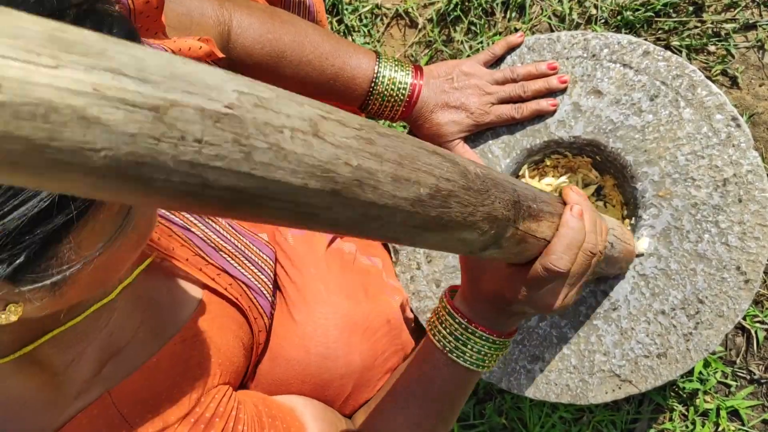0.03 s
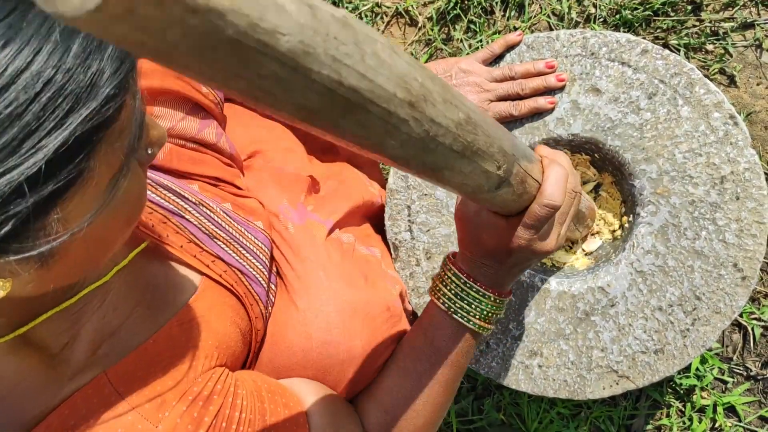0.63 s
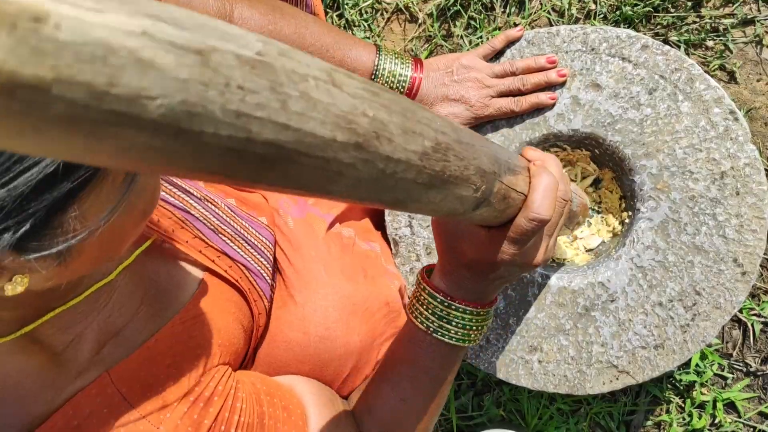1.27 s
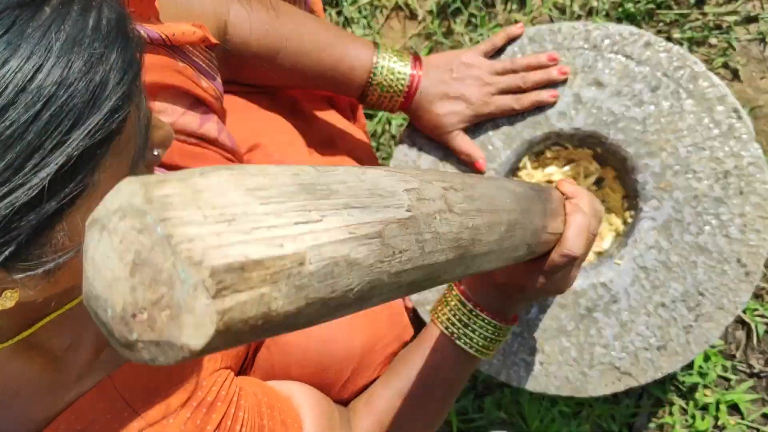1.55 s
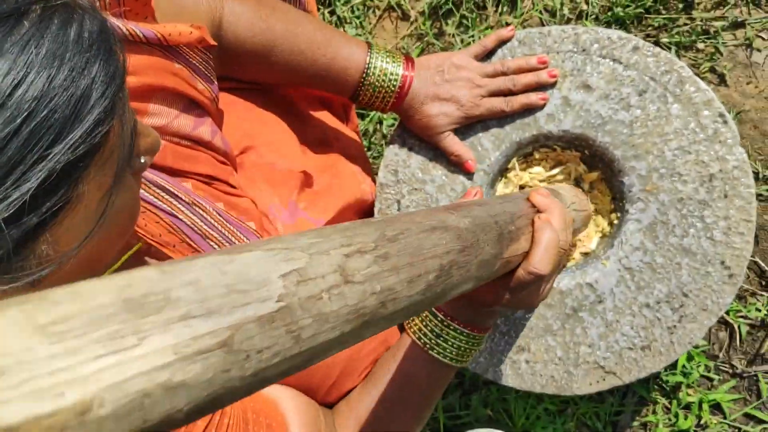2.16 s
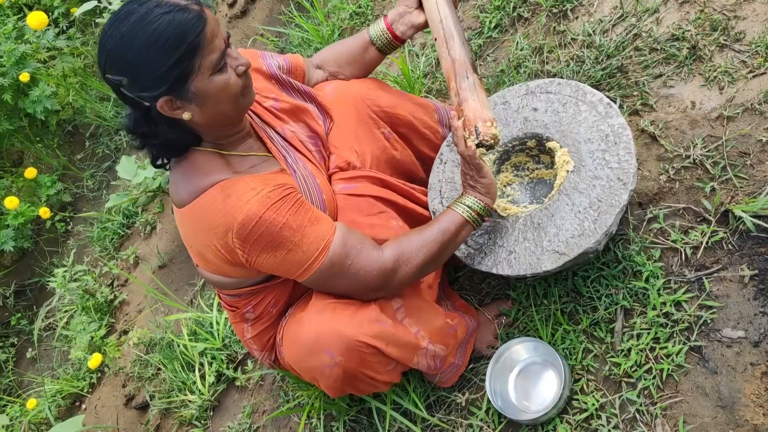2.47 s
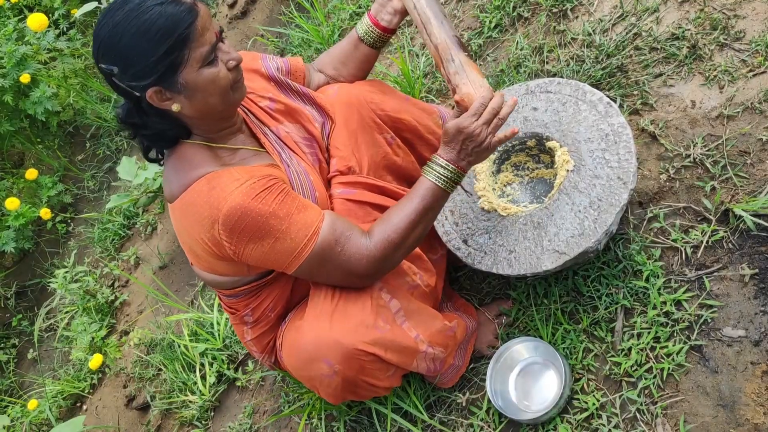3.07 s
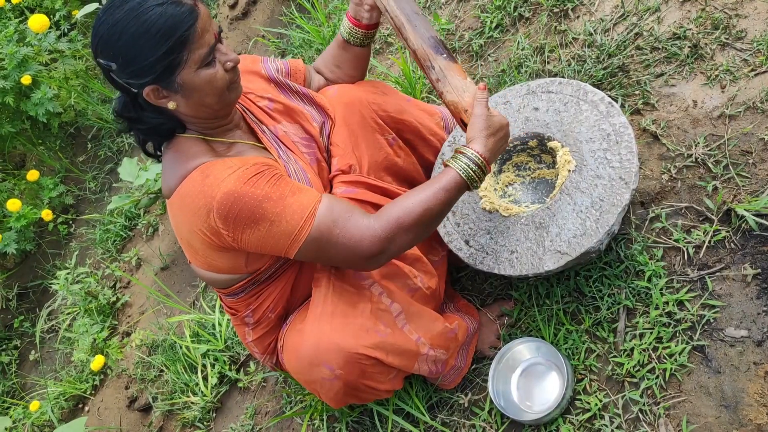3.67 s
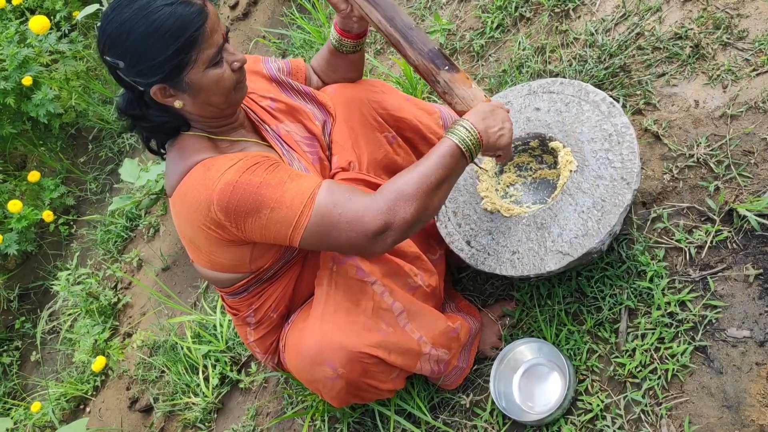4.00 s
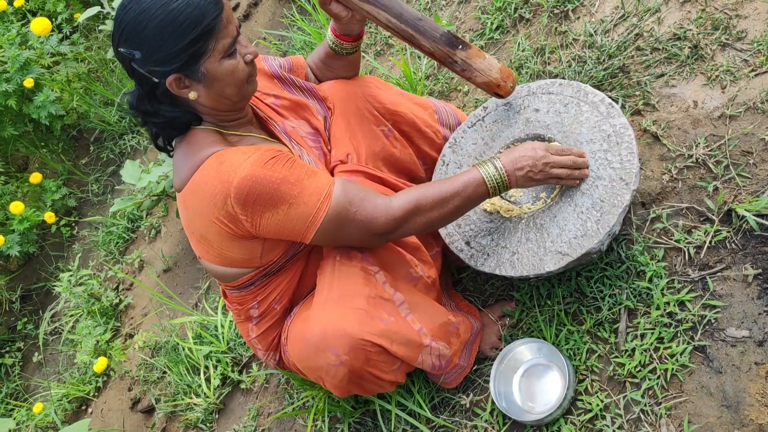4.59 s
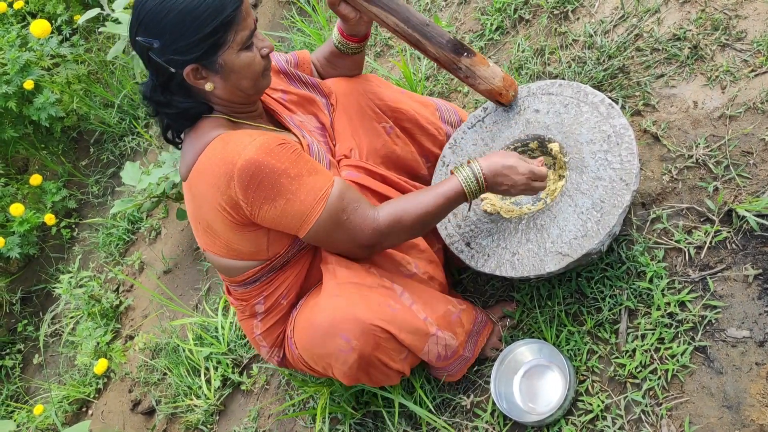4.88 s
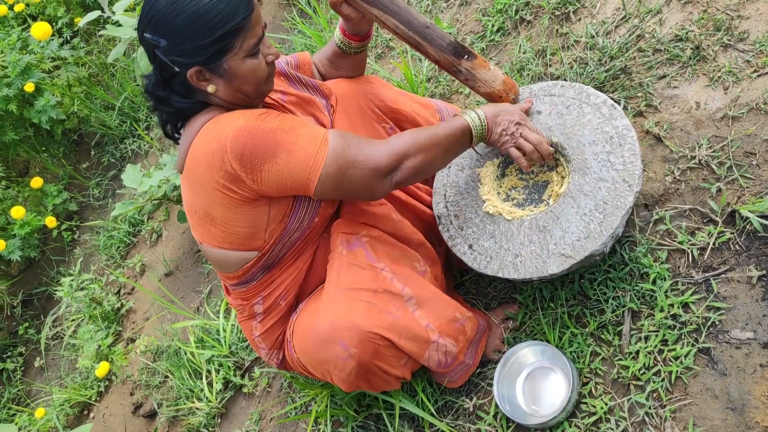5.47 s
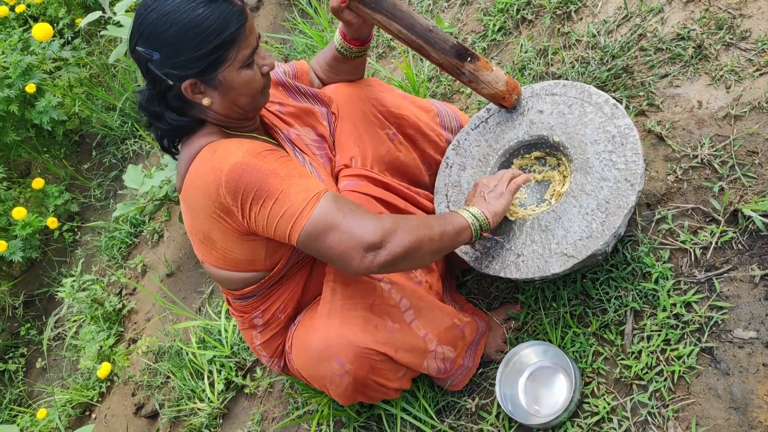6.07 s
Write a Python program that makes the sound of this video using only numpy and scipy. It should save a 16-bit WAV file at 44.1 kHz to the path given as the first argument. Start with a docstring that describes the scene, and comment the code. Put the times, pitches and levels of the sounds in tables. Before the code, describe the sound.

A wooden pestle pounds moist food in a stone mortar outdoors, heard from close by. Sharp knocks land right at the start and at about 0.5 seconds, then blows with a duller thud at 0.9 and 1.8 seconds. The mash gives short wet squelches, including a soft one near 1.3 seconds, and glass bangles clink between the blows. At 2.2 seconds the background shifts as if heard from a step further back: the low hum of a distant engine, present throughout with light wind, grows a little louder and a faint machine drone joins. Fingertips tap the stone lightly just after 3 seconds. From about 4 to 5.8 seconds a hand gathers the mash with tiny moist ticks, and the bangles clink near 4.3 seconds. A distant vehicle passes around 5.7 seconds. Faint birds whistle early on, then chirp and hoot now and then.

```python
"""A long wooden pestle pounds moist food in a stone mortar outdoors. Each impact excites the modes of shaft and
bowl; the squeezed mash squelches as wet films burst, and glass bangles clink on the wrist. From 2.2 s the
background changes; fingertips tap and a hand gathers the mash. A distant engine hums throughout, with light
wind, a far machine, a passing vehicle and a few birds."""
import sys
import numpy as np
from scipy import signal
from scipy.fft import rfft, irfft, next_fast_len
from scipy.io import wavfile
from scipy.ndimage import uniform_filter1d

SR = 44100
rng = np.random.default_rng(int(sys.argv[2]) if len(sys.argv) > 2 else 0)


def materialize(psi):
    """Save the field psi as 16-bit PCM at rate SR to the path in sys.argv[1].

    A 1-D psi becomes a single channel; in a 2-D psi each row is a channel.
    """
    bounded = np.clip(np.atleast_2d(psi).T, -1, 1)
    quanta = np.round(bounded * 32767).astype(np.int16)
    wavfile.write(sys.argv[1], SR, quanta)


N = 279594
TIME = np.arange(N) / SR
AGE = TIME[:SR // 2]  # time since the start of one event

# open-air hush, before and after 2.2 s: frequency_hz, relative_db
EARLY_HUSH_SPECTRUM = [(110, -19), (180, -4), (389, -22.5), (599, -20.5), (722, -14), (793, -18.5),
                       (1070, -22), (1370, -21), (1650, -19.5), (2310, -23), (3120, -27.5), (6260, -25.5),
                       (16000, -34)]
LATE_HUSH_SPECTRUM = [(200, 3), (400, -1), (560, -0.5), (680, -4.5), (900, 0), (1450, 0), (1750, -9.5),
                      (2080, 0), (2400, -4.5), (2850, -10), (3120, -14), (5200, -17.5), (8000, -15.5),
                      (10500, -24.5), (16000, -23.5)]
# wind rumble: frequency_hz, relative_db
WIND_SPECTRUM = [(12, 13), (35, 7), (60, 5), (100, 0.5), (145, -6.5), (200, -41), (300, -34)]
# gusts: peak_s, half_width_s, level_db
WIND_GUSTS = [(0.976, .025, -29.5), (1.15, 0.17, -48), (2.096, 0.16, -42.5)]
# noise bands of a far machine: centre_hz, width_hz, level_db
MACHINE_BANDS = [(527, 31, -69.5), (587, 10.5, -66.5), (2086, 70, -78), (2845, 56, -77.5), (3680, 480, -80)]
# far tyres: frequency_hz, relative_db
TYRE_SPECTRUM = [(400, -31), (720, -8.5), (890, 7.5), (1080, -7), (1750, -13.5), (2130, -3), (2450, -14),
                 (2780, -0.5), (3150, -21.5), (3950, -7.5), (4500, -18.5), (5300, -14.5), (6500, -20),
                 (16000, -31)]
# firing rate of the engine: time_s, rate_hz
FIRING_RATE = [(0, 78), (2.1, 77.5), (2.5, 79.8), (4.4, 77.74), (6.34, 76)]
# rising chirps of a small bird: start_s, length_s, start_hz, level_db, tip_accent_db
BIRD_CHIRPS = [(2.34, 0.13, 4140, -66.5, 5), (2.575, 0.11, 4150, -66, 10), (2.81, .14, 4140, -61, -6),
               (4.868, .07, 5200, -68.5, -3), (5.452, 0.099, 4270, -63, 5), (5.696, .07, 4430, -55.5, -1),
               (5.904, 0.11, 4300, -61, -4), (6.146, 0.12, 4340, -62.5, 5)]
# arched whistles of a far bird: start_s, length_s, start_hz, level_db
BIRD_WHISTLES = [(0.106, 0.33, 1730, -62.5), (0.597, 0.29, 1620, -67.5), (1.543, 0.21, 1640, -67.5),
                 (1.955, 0.25, 1640, -71), (3.573, 0.22, 1666, -67)]
# evenly paced hoots of a far bird: start_s, level_db
BIRD_HOOTS = [(2.21, -60.5), (3.459, -55.5), (4.732, -56), (5.961, -57)]
# fingertips tap the stone: start_s, level_db
FINGER_TAPS = [(3.008, -62), (3.083, -53.5), (3.173, -47.5), (3.258, -61), (6.235, -59)]
# a fingertip on gritty stone: frequency_hz, relative_db
FINGER_SPECTRUM = [(1100, -18), (1600, 10.5), (2200, -26), (3600, -15), (4300, -3), (5200, -18), (7400, -9),
                   (8700, 1), (9600, -10), (10800, -24), (15000, -30)]
# bangles knock together: start_s, peak_db, chatter_s
BANGLE_CLINKS = [(0.07, -13.5, 0.0031), (0.117, -12, 0.00024), (0.2175, -22.5, 0.01),
                 (0.472, -20.5, 0.0017), (0.561, -31, 0.022), (0.6275, -37.5, 0), (0.651, -21.5, 0.018),
                 (0.8993, -24, 0), (0.962, -23.5, 0), (0.981, -33, .024), (1.39, -23.5, 0.014),
                 (1.501, -14, .008), (1.5203, -18, 0.0083), (1.856, -23, .004), (2.2947, -38.5, 0),
                 (4.3208, -27.5, 0.019), (4.36, -36.5, 0.047), (4.4767, -45, 0)]
# modes of a glass hoop: pitch_hz, level_db, t60_s
BANGLE_MODES = [(4660, -20.5, 0.037), (4940, -16.5, 0.022), (6640, -18.5, .015), (8100, -6.5, 0.015),
                (8780, -5.5, 0.019), (9400, -10, 0.045), (9450, -16, 0.019), (10250, -14, 0.037),
                (12610, -14, 0.018), (12560, 0.5, 0.018), (13430, -16, 0.022), (14130, -2, 0.03),
                (14950, -8.5, 0.013), (15750, 4.5, 0.031), (15500, -11.5, 0.013)]
# the pestle squeezes the mash: start_s, level_db, swell_s, length_s, tilt_db_per_octave, cavity_hz, seep_db
MASH_SQUEEZES = [(0.0651, -27, .005, .017, -0.5, 7600, -6.5), (0.485, -30, .008, 0.027, 1, 7500, -12),
                 (0.9182, -18, 0.01, 0.015, 1.5, 7260, -19.5), (1.336, -30.5, 0.02, 0.033, -1.5, 6700, -8),
                 (1.8017, -14, 0.0032, .006, 0, 7305, -29), (1.826, -26.5, 0.0032, 0.0052, -1.5, 6590, -15)]
# crackle of wet mash: frequency_hz, relative_db
MASH_SPECTRUM = [(150, -27), (400, -16), (1200, -12), (1800, -5), (3000, -14.5), (4600, -3.5), (5700, -7),
                 (7400, 1), (8800, -4.5), (10000, -7), (11000, -9.5), (12500, -2), (15500, -4)]
# the pestle bottoms in the mash: start_s, level_db, contact_ms
CUSHIONED_BLOWS = [(0.9301, 0.5, 1.6), (0.9314, -11, 2.8), (1.8045, 3.5, 1.17), (1.88, -27, 2)]
# air pocket under the tip: pitch_hz, level_db, t60_s
POCKET_MODES = [(222, -15.5, 0.0075), (350, -2, 0.014), (524, 1, 0.008), (690, -13.5, 0.0058)]
# grit crushed at the contact: frequency_hz, relative_db
GRIT_SPECTRUM = [(150, -4), (700, 0.5), (1500, -5.5), (2700, -5), (4000, -12.5), (6500, -22.5),
                 (15000, -24.5)]
# heavy stone bowl on soft ground, damped by the food: pitch_hz, level_db, t60_s
BOWL_MODES = [(165, -19.5, 0.016), (617, -22, 0.029), (737, -6, .015), (860, -5, 0.0085),
              (1220, -27, 0.012), (1470, -16.5, 0.023)]
# bending modes of the shaft: pitch_hz, level_db, t60_s, sideways_coupling, rim_coupling
SHAFT_MODES = [(414.4, -10.5, 0.17, 0.051, -0.22), (1007, -5.5, 0.098, 0.27, -.2),
               (1740, -14.5, .065, -0.35, -0.022), (1878, -14.5, 0.086, 0.27, 0.55),
               (2517, -22, .03, 0, 0.93), (2640, -17, 0.028, -.5, -0.1), (2870, -19.5, 0.043, 0.43, -0.058),
               (3070, -30.5, 0.052, -0.32, 0.98), (3880, -28, 0.13, -0.24, -0.62), (4500, -37, .03, 0, .3),
               (6400, -27, 0.041, -0.54, -.3)]
# pestle meets stone: start_s, level_db, contact_ms, shaft_db, sideways_db, rim_db, clack_db, grit_db
HARD_BLOWS = [(0.0026, -6, 0.59, 0, 3, -13.5, -5, -20), (0.4698, -4, 0.39, -0.5, 6.5, 9, 0.5, -27.5),
              (0.8962, -0.5, 0.39, -4, -13, 2.5, -1, -25), (0.9308, -17, 0.52, -1.5, -11, -4, 4, -11),
              (1.8067, -2.5, 0.44, -6.5, -22.5, 14, 1.5, -17),
              (1.8267, -25.5, 0.19, -1.5, 4, 2.5, -17.5, -15.5)]


def undb(db):
    """Decibels to amplitude ratio."""
    return 10 ** (np.asarray(db) / 20)


def unit(x):
    """Normalisation to rms 1."""
    return x / np.sqrt(np.mean(x ** 2))


def curve(rows):
    """Linear interpolation of (time_s, value) points."""
    return np.interp(TIME, *np.transpose(rows))


def add(out, start_s, sound):
    """Superposition: a sound sums into the mix from start_s."""
    start = max(int(start_s * SR), 0)
    out[start:start + len(sound)] += sound[:N - start]


def colour(x, points, tilt_db=0):
    """Spectral shaping by (frequency_hz, relative_db) points and a tilt per octave; rms 1."""
    hz, db = np.transpose(points)
    size = next_fast_len(len(x))
    octave = np.log2(np.fft.rfftfreq(size, 1 / SR) + 1)
    octaves_outside = np.maximum(np.log2(hz[0]) - octave, 0) + np.maximum(octave - np.log2(hz[-1]), 0)
    gain_db = np.interp(octave, np.log2(hz), db) + tilt_db * octave - 24 * octaves_outside
    return unit(irfft(rfft(x, size) * undb(gain_db), size)[:len(x)])


def noise(points, size=N, tilt_db=0):
    """Stationary Gaussian noise with a given spectrum."""
    return colour(rng.standard_normal(size), points, tilt_db)


def walk(rate_hz):
    """Smooth random modulation with rms 1."""
    hold = int(SR / rate_hz)
    steps = np.repeat(rng.standard_normal(N // hold + 1), hold)
    return unit(uniform_filter1d(steps, hold)[:N])


def fade(t60_s, hold_s=0):
    """Exponential decay: after hold_s the level falls 60 dB every t60_s."""
    return np.exp(-np.log(1000) * np.maximum(AGE - hold_s, 0) / t60_s)


def ring(hz, db, t60_s, phase):
    """Free vibration of one damped mode."""
    return undb(db) * fade(t60_s) * np.sin(2 * np.pi * hz * AGE + phase)


def body(modes, phase_step=np.pi):
    """Modal superposition; neighbouring modes of a bending shaft have opposite phase."""
    return sum(ring(hz, db, t60, np.pi / 2 + k * phase_step) for k, (hz, db, t60) in enumerate(modes))


def push(response, contact_ms):
    """Convolution with a smooth force pulse: longer contact gives a duller sound."""
    progress = AGE[:SR // 100] / (contact_ms / 1000)
    force = progress * np.exp(-5 * progress)
    return signal.fftconvolve(response, force / force.sum())[:len(response)]


def outdoors(x, wet_db, t60_s):
    """Scattering from ground and plants adds a thin tail to the direct sound."""
    tail = rng.standard_normal(len(AGE)) * fade(t60_s) * (1 - fade(0.0067))
    return x + undb(wet_db) * signal.fftconvolve(x, tail / np.linalg.norm(tail))[:N]


def later_background(at_s=2.21, crossfade_s=0.0037):
    """Linear crossfade of the background: 0 before 2.21 s, 1 after it."""
    return np.clip((TIME - at_s) / crossfade_s + .5, 0, 1)


def hush(early_db=-59, late_db=-57.5):
    """Broadband ambient noise, whose spectrum changes at 2.2 s."""
    late = later_background()
    early_hush = (1 - late) * undb(early_db) * noise(EARLY_HUSH_SPECTRUM)
    return early_hush + late * undb(late_db) * noise(LATE_HUSH_SPECTRUM)


def wind(breeze_db=-46.5):
    """Pressure fluctuations of a breeze rumble at the listening point and swell in gusts."""
    gusts = sum(undb(db) * np.exp(-((TIME - peak_s) / half_s) ** 2) for peak_s, half_s, db in WIND_GUSTS)
    return (undb(breeze_db) + gusts) * undb(2.7 * walk(6)) * noise(WIND_SPECTRUM)


def machine():
    """Narrow-band noise: a far machine drones in the background heard after 2.2 s."""
    drone = np.zeros(N)
    for hz, width, db in MACHINE_BANDS:
        band = [(hz - 2 * width, -45), (hz - width / 2, -3), (hz + width / 2, -3), (hz + 2 * width, -45)]
        drone += undb(db + 0.57 * walk(5.6)) * noise(band)
    easing_off = curve([(4.65, 0.93), (5.1, 0.16)])
    return drone * later_background() * easing_off


def vehicle(nearest_s=5.75, half_power_s=0.3, level_db=-55):
    """Spherical spreading: the tyre noise of a passing vehicle varies inversely with distance."""
    relative_distance = np.hypot(1, (TIME - nearest_s) / half_power_s)
    return later_background() * undb(level_db + walk(7)) / relative_distance * noise(TYRE_SPECTRUM)


def engine(early_db=-46.5, late_db=-41, throb_db=1.1, wander=.012, overtone_db=-25):
    """Periodic firing, throbbing unevenly: only the fundamental and a faint octave carry this far."""
    firing_hz = curve(FIRING_RATE) * (1 + wander * walk(15))
    phase = 2 * np.pi * np.cumsum(firing_hz) / SR
    tone = np.sqrt(2) * (np.sin(phase) + undb(overtone_db) * np.sin(2 * phase))
    level_db = early_db + (late_db - early_db) * later_background()
    return undb(level_db + throb_db * walk(15)) * tone


def whistle(length_s, start_hz, end_hz, arch_hz, hook_hz=0, tip_db=0, waver=0.0046, flutter_db=2):
    """Frequency modulation: a sine follows an arched glide whose tip may be accented and hook down."""
    size = int(length_s * SR)
    along = np.linspace(0, 1, size)
    hz = start_hz + (end_hz - start_hz) * along + arch_hz * np.sin(np.pi * along) - hook_hz * along ** 12
    hz *= 1 + waver * walk(151.3)[:size]
    envelope = np.sqrt(2 * np.abs(np.sin(np.pi * along)))
    envelope *= undb(tip_db * along ** 4 + flutter_db * walk(53.6)[:size])
    return envelope * np.sin(2 * np.pi * np.cumsum(hz) / SR)


def birds():
    """Nearly pure tones with scattered tails: chirps nearby, whistles and low hoots far away."""
    near, far = np.zeros(N), np.zeros(N)
    for start_s, length_s, start_hz, db, tip_db in BIRD_CHIRPS:
        chirp = whistle(length_s, start_hz, end_hz=5780, arch_hz=199, hook_hz=470,
                        tip_db=tip_db, waver=0.0087, flutter_db=3)
        add(near, start_s, undb(db) * chirp)
    for start_s, length_s, start_hz, db in BIRD_WHISTLES:
        call = whistle(length_s, start_hz, end_hz=start_hz - 90, arch_hz=91, waver=.014)
        add(far, start_s, undb(db) * call)
    for start_s, db in BIRD_HOOTS:
        add(far, start_s, undb(db) * whistle(length_s=0.058, start_hz=303, end_hz=281, arch_hz=9.4))
    return outdoors(near, wet_db=-7.5, t60_s=0.62) + outdoors(far, wet_db=-5.5, t60_s=0.34)


def gathering(start_s=4.1, end_s=5.8, crumbs_per_s=19, crumb_db=-63.5, scoop_s=4.805, scoop_db=-62):
    """A Poisson process: moist crumbs tick at random under the hand, with one soft scoop."""
    working = (TIME > start_s) & (TIME < end_s)
    onsets = working * (rng.random(N) < crumbs_per_s / SR)
    impulses = onsets * undb(crumb_db + 4 * rng.standard_normal(N))
    crumbs = signal.fftconvolve(impulses, fade(t60_s=0.03))[:N]
    scoop = undb(scoop_db + 3.4 * walk(200)) * np.exp(-((TIME - scoop_s) / 0.025) ** 2)
    return (crumbs + scoop) * noise(MASH_SPECTRUM, tilt_db=1)


def fingers(t60_s=0.081, press_s=0.004):
    """Soft impacts: fingertips on gritty stone give decaying bursts of noise."""
    out = np.zeros(N)
    envelope = fade(t60_s) * np.minimum(AGE / press_s, 1)
    for start_s, db in FINGER_TAPS:
        add(out, start_s, undb(db) * noise(FINGER_SPECTRUM, len(AGE)) * envelope)
    return out


def clink(detune=0.031, scatter_db=4, tick_db=1, attack_s=0.0012):
    """Free vibration of two slightly unlike glass hoops, with a friction tick as they slide; peak 1."""
    hoops = 0
    for _ in range(2):
        deviations = rng.standard_normal((len(BANGLE_MODES), 3))
        for (hz, db, t60_s), (pitch, level, phase) in zip(BANGLE_MODES, deviations):
            hoops += ring(hz * (1 + detune * pitch), db + scatter_db * level, t60_s, np.pi * phase)
    tick = noise([mode[:2] for mode in BANGLE_MODES], len(AGE)) * fade(t60_s=0.019)
    touch = (hoops + undb(tick_db) * tick) * np.minimum(AGE / attack_s, 1)
    return touch / np.abs(touch).max()


def bangles(count=12, gap_s=.0055, jitter=0.36, drop_db=13):
    """Inelastic collisions: jolted by the wrist, the hoops rebound unevenly in ever weaker touches."""
    out = np.zeros(N)
    touches = [clink() for _ in range(count)]
    for start_s, db, chatter_s in BANGLE_CLINKS:
        gaps = gap_s * np.exp(jitter * rng.standard_normal(count))
        for delay_s, which in zip(np.cumsum(gaps) - gaps[0], rng.permutation(count)):
            if delay_s <= chatter_s:
                touch_db = db - drop_db * delay_s / (chatter_s + gap_s)
                add(out, start_s + delay_s, undb(touch_db) * touches[which])
    return out


def mash(bursts_per_s=6000, scatter_db=3, hiss=.55, cavity_db=3, cavity_width_hz=1100, pop_db=2):
    """Cavity resonance colours the crackle of bursting wet films and the hiss of escaping air."""
    out = np.zeros(N)
    size = len(AGE)
    for start_s, db, swell_s, length_s, tilt_db, cavity_hz, seep_db in MASH_SQUEEZES:
        bursts = (rng.random(size) < bursts_per_s / SR) * rng.choice([-1, 1], size)
        bursts = bursts * undb(scatter_db * rng.standard_normal(size))
        crackle = colour(unit(bursts) + hiss * rng.standard_normal(size), MASH_SPECTRUM, tilt_db)
        cavity = signal.lfilter(*signal.iirpeak(cavity_hz, cavity_hz / cavity_width_hz, fs=SR), crackle)
        squelch = unit(crackle + undb(cavity_db) * cavity)
        # the squeeze lets go quickly, juice seeps on, and the cavity pops at the release
        release = fade(t60_s=0.012, hold_s=length_s)
        seep = undb(seep_db) * fade(t60_s=0.2, hold_s=length_s)
        pop = undb(pop_db) * (AGE > length_s) * fade(t60_s=0.0037, hold_s=length_s)
        squeeze = np.minimum(AGE / swell_s, 1) ** 2 * np.maximum(release, seep)
        add(out, start_s, undb(db) * np.hypot(squeeze, pop) * squelch)
    return out


def pestle(grit_t60_s=0.023):
    """Impact excitation: hard blows ring shaft and bowl and crush grit; soft ones thump trapped air."""
    out = np.zeros(N)
    bowl = body(BOWL_MODES, phase_step=0)
    for start_s, db, contact_ms, shaft_db, side_db, rim_db, clack_db, grit_db in HARD_BLOWS:
        # a blow landing sideways or on the rim of the tip favours different bending modes
        shaft = body([(hz, mode_db + side * side_db + rim * rim_db, t60_s)
                      for hz, mode_db, t60_s, side, rim in SHAFT_MODES])
        blow = push(undb(clack_db) * bowl - undb(shaft_db) * shaft, contact_ms)
        grit = undb(grit_db) * noise(GRIT_SPECTRUM, len(AGE)) * fade(grit_t60_s)
        add(out, start_s, undb(db) * (blow + grit))
    for start_s, db, contact_ms in CUSHIONED_BLOWS:
        add(out, start_s, undb(db) * push(body(POCKET_MODES), contact_ms))
    return out


def scene():
    """Superposition of the work at the mortar and its surroundings, in one channel."""
    work = outdoors(pestle() + mash() + bangles() + fingers(), wet_db=-20.5, t60_s=0.086)
    surroundings = birds() + engine() + hush() + machine() + vehicle() + wind()
    return (work + surroundings + gathering())[None]


def record(dry, cutoff_hz=15900):
    """Hard clipping at full scale, then a steep low-pass filter."""
    lowpass = signal.ellip(8, .2, 70, cutoff_hz, fs=SR, output="sos")
    return signal.sosfilt(lowpass, np.clip(dry, -1, 1))


dry = scene()
out = record(dry)
materialize(out)
```